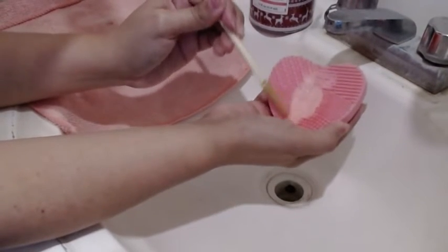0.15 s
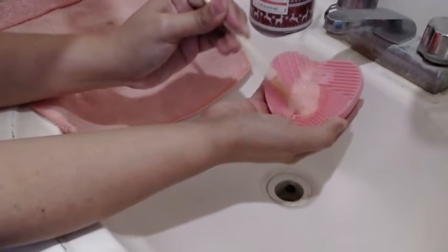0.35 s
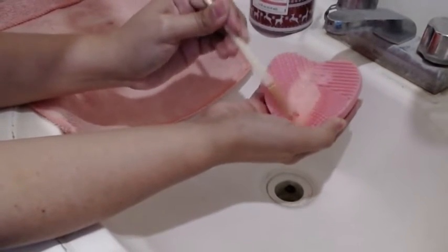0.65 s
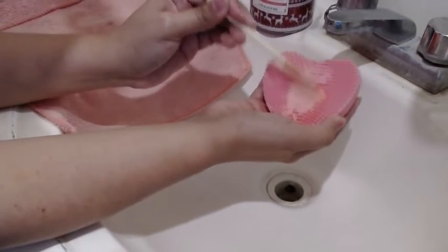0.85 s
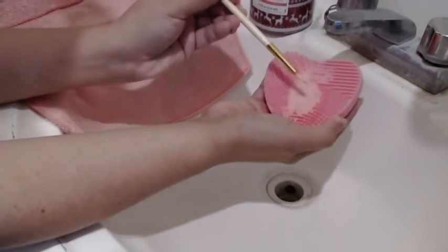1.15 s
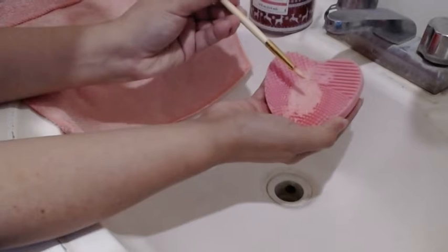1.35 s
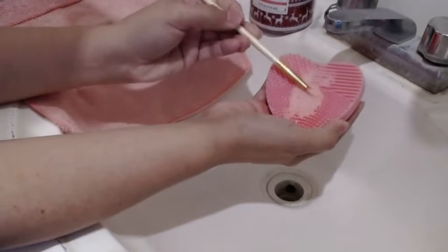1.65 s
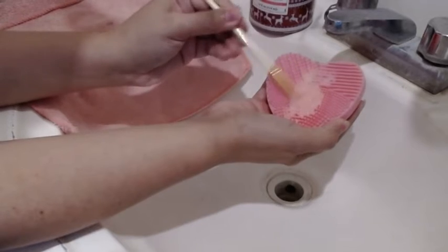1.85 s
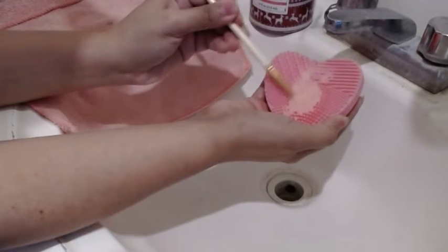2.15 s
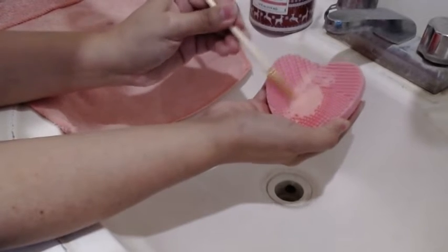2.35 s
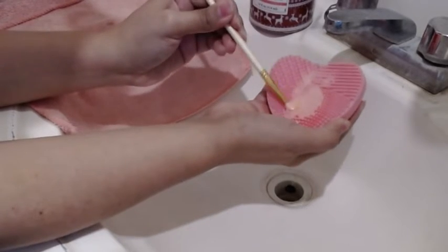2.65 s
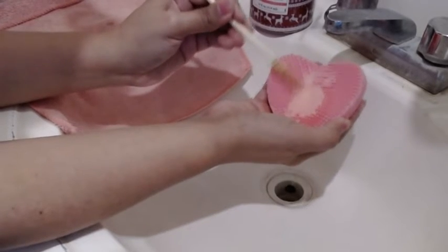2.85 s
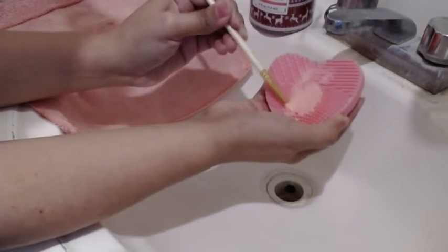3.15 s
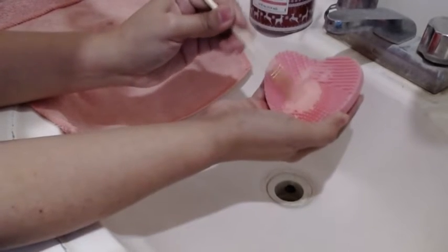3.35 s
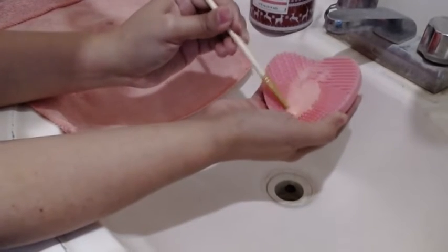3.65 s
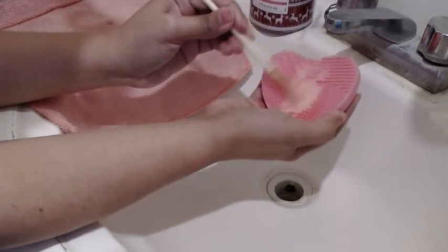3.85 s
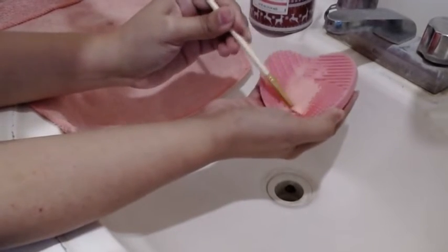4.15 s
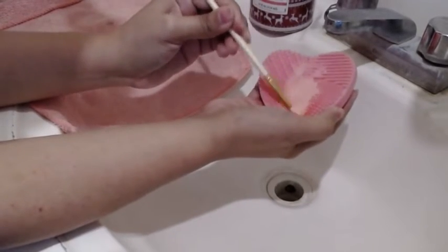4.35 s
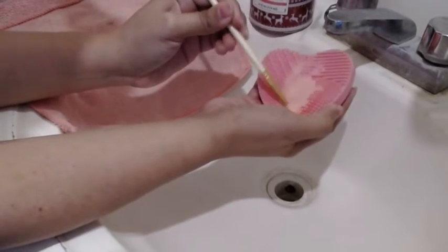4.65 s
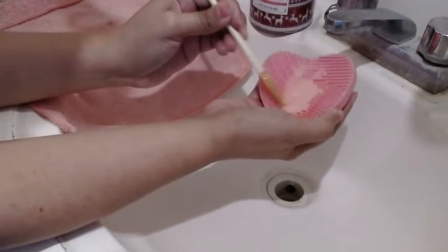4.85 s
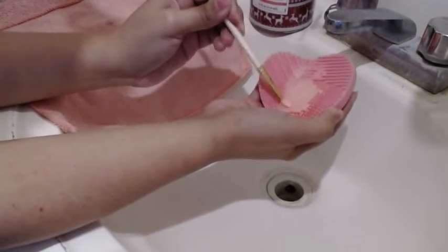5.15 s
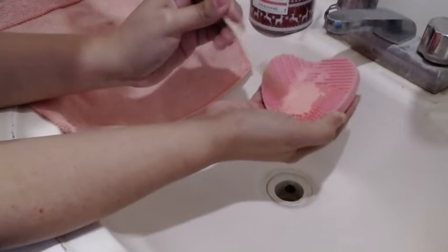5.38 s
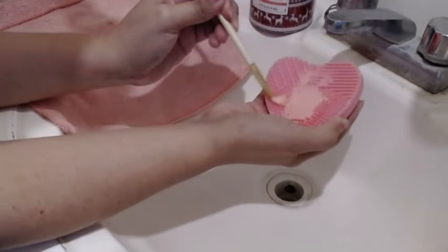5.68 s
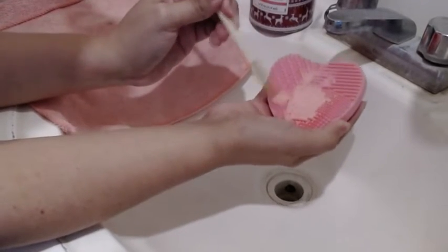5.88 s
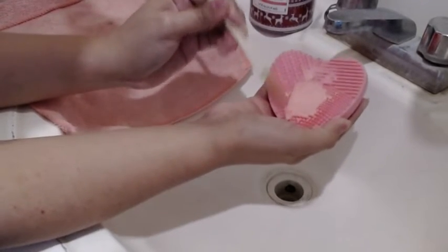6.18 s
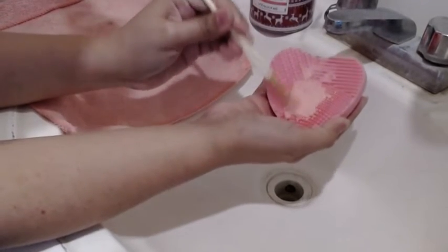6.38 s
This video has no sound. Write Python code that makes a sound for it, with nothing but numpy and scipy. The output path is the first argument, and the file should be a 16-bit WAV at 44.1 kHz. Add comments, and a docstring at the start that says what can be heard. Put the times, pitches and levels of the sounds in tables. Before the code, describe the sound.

Close to the microphone, bristles rub rapidly to and fro over a ribbed silicone pad above a washbasin, making a fine, slightly hollow hiss with faint soapy crackle. The scrubbing stops for a moment early on, then carries on more firmly, the brush now and then knocking the pad. Behind it, the tiled room holds a low hum and a softly swelling boom, with a few soft counter bumps late on.

```python
"""A small brush scrubs to and fro, eight strokes a second, on a ridged silicone pad above a washbasin.
Close to the one microphone, bristles flick off the ridges and hiss, soap film ticks, the hollow pad
resounds and the ferrule now and then knocks it. Behind, in the tiled room: a steady low hum, a swelling
boom, a faint drone and whir, a few dull thuds on the counter, building rumble and faint air noise."""
import sys
import numpy as np
from scipy import signal
from scipy.fft import rfft, irfft, next_fast_len
from scipy.io import wavfile
from scipy.ndimage import uniform_filter1d, map_coordinates

SR = 44100
rng = np.random.default_rng(int(sys.argv[2]) if len(sys.argv) > 2 else 0)


def digitize_waveform(pressure):
    """Quantize a signal to 16-bit integers and store it at the path in sys.argv[1].

    Rows of a 2-D input are taken as channels; values are limited to [-1, 1].
    """
    field = np.atleast_2d(pressure).T
    bounded = np.clip(field, -1, 1)
    quanta = np.round(bounded * 32767).astype(np.int16)
    wavfile.write(sys.argv[1], SR, quanta)


N = 287532
T = np.arange(N) / SR

# Spectra of the bristles' hiss and of their sharper tips: frequency_hz, level_db
HISS_SPECTRUM = [(1500, -23.5), (3000, -4.5), (4300, -2.5), (5600, -1.5), (6800, 1.5), (8200, -1.5),
                 (9500, -6.5), (12000, -18), (16000, -40)]
TIP_SPECTRUM = [(5000, -47), (8500, -3), (10000, -6), (12500, -3), (15000, -7), (17000, -1)]
# Upper resonances of the pad: pitch_hz, width_hz, level_db
PAD_OVERTONES = [(1547, 190, -1.5), (1998, 92, 0.5), (2280, 79, 2), (2480, 106, -1), (2743, 212, 0),
                 (3670, 95, -9.5)]
# Changing colour of the scrubbing: time_s, tips_db, overtones_db, lower_hiss_db
SCRUB_COLOUR = [(0, -10.5, -2.5, 0.5), (.45, -3.5, -2.5, -3), (.9, -4, -6, -1), (1.9, -11, -7, -0.5),
                (2.3, -5.5, -6.5, 5.5), (2.9, -9, -6.5, 1.5), (3.5, -5, -3, 4.5), (4, -1, -5.5, -2),
                (4.7, -1, -2, 0), (5.2, -7.5, -2.5, 4.5), (5.75, -5, -13.5, -7.5), (6.1, -1.5, -10.5, -2),
                (6.3, -14, -2.5, 1), (6.52, -2, -2, 5)]
# Bumps on the counter: start_s, level_db, hardness_db
BUMPS = [(4.694, -39, -22), (5.059, -49.5, 6), (5.383, -39.5, -18), (6.326, -34, -7.5)]


def amp(db):
    return 10 ** (np.asarray(db) / 20)


def unit(x):
    return x / np.sqrt(np.mean(x ** 2) + 1e-20)


def along(points, hz):
    """Interpolate (frequency, value) points on a log axis."""
    f, v = np.transpose(points)
    return np.interp(np.log(hz + 1), np.log(f + 1), v)


def curves(rows):
    """One value per sample for each column after the time."""
    s, *cols = np.transpose(rows)
    return [np.interp(T, s, c) for c in cols]


def wobble(rate):
    """A smooth random curve, rate knots a second."""
    return map_coordinates(rng.standard_normal(int(N * rate / SR) + 4), [T * rate])


def filtered(x, response):
    m = next_fast_len(N + SR // 2)
    return irfft(rfft(x, m) * response(np.fft.rfftfreq(m, 1 / SR)), m)[..., :N]


def coloured(x, spectrum):
    return unit(filtered(x, lambda hz: amp(along(spectrum, hz))))


def resounding(x, modes):
    """x through causal resonances of alternating sign."""
    return filtered(x, lambda f: sum(
        (-1) ** k * amp(db) * 1j * f * width / (hz * hz - f * f + 1j * f * width)
        for k, (hz, width, db) in enumerate(modes)))


def patchy(x, depth_db, window=512, bins=2, frames=12):
    """Raise and lower x in random patches of frequency and time."""
    z = signal.stft(x, nperseg=window)[2]
    field = uniform_filter1d(rng.standard_normal(z.shape), bins, axis=0)
    field = uniform_filter1d(field, frames, axis=1)
    return signal.istft(z * amp(depth_db * unit(field)), nperseg=window)[1][:N]


def swells(peak_s, rise_ms, fall_ms, db, bends):
    """Envelope of swells, about 8 dB down at rise_ms before and fall_ms after each peak."""
    power = np.zeros(N)
    for at, rise, fall, level in np.broadcast(peak_s, rise_ms / 1000, fall_ms / 1000, db):
        gap = np.abs(T - at)
        away = np.where(T < at, (gap / rise) ** bends[0], (gap / fall) ** bends[1])
        power += amp(level - 8.47 * np.minimum(away, 12)) ** 2
    return np.sqrt(power)


def tone(hz, rms):
    return np.sqrt(2) * rms * np.sin(2 * np.pi * np.cumsum(hz) / SR)


def bristle_coloured(x, tips_db):
    return filtered(x, lambda f: amp(np.maximum(along(HISS_SPECTRUM, f), along(TIP_SPECTRUM, f) + tips_db)))


def room_tone():
    """Building rumble and the faint air noise of the room."""
    # Spectra of the two: frequency_hz, level_db
    rumble_spectrum = [(12, -25), (24, 2.5), (38, -8), (50, -32), (63, -10.5), (76, -4), (100, -13),
                       (150, -19.5), (175, -18.5), (185, -22.5), (200, -28), (226, -17.5), (245, -31),
                       (275, -25.5), (300, -32), (420, -42), (700, -86)]
    air_spectrum = [(240, -19), (400, -3), (474, -12.5), (504, -11.5), (708, -13.5), (906, -3),
                    (1350, -13.5), (1680, -4), (2250, -19.5), (3160, -17.5), (3420, -20), (8240, -22.5),
                    (16000, -25)]
    noise = rng.standard_normal((2, N))
    rumble = amp(-49 + 1.24 * wobble(3.046)) * coloured(noise[0], rumble_spectrum)
    return rumble + amp(-62.5 + 1.6 * wobble(5.42)) * coloured(noise[1], air_spectrum)


def hum(pitch_hz=90.8, level_db=-38.5):
    """A steady low tone in the room."""
    return tone(pitch_hz + 0.17 * wobble(1.88), amp(level_db + 0.16 * wobble(3.77)))


def boom(pitch_hz=108):
    """A wavering tone that swells just above the hum."""
    # Its underlying level: time_s, level_db
    bed = [(0, -50), (.8, -45.5), (1.3, -59.5), (1.85, -54), (2.7, -47), (3.3, -43.5), (4.3, -45),
           (5.3, -50.5), (6.52, -49.5)]
    # Its loudest swells: peak_s, half_length_ms, level_db
    surges = [(.21, 50, -38), (.69, 34, -33), (1.94, 52, -40.5), (2.14, 42, -34), (2.41, 65, -32.5),
              (3.07, 180, -39), (3.35, 81, -33), (3.82, 57, -29.5), (4.11, 50, -41), (5.16, 43, -43.5),
              (5.41, 28, -40), (5.67, 80, -37), (5.93, 26, -35), (6.45, 33, -31)]
    s, half, db = np.transpose(surges)
    base = amp(curves(bed)[0] + 5 * wobble(12))
    surge = swells(s, half, half, db, (1.6, 1.6)) * amp(0.73 * wobble(13))
    return tone(pitch_hz + 3.59 * wobble(7.4), np.hypot(base, surge))


def whir(start_s=0.97, length_s=0.5, pitch_hz=153, level_db=-54):
    """A faint tone comes and goes once."""
    fade = np.interp(T - start_s, [0, .08, length_s - .08, length_s], [0, 1, 1, 0])
    return tone(pitch_hz + 0.72 * wobble(5), amp(level_db) * fade)


def drone(pitch_hz=137, rise_ms=19, fall_ms=125):
    """A wandering tone that each thud sets swelling."""
    # Its underlying level: time_s, level_db
    bed = [(0, -54), (1.6, -59), (2.05, -49.5), (2.7, -53), (3.8, -45), (4.3, -52), (5.2, -55),
           (6.1, -58.5), (6.52, -43)]
    s, db, _ = np.transpose(BUMPS)
    stirred = swells(s + rise_ms / 1000, rise_ms, fall_ms, db - 5.5, (3.2, 1.5))
    level = np.hypot(amp(curves(bed)[0]), stirred)
    return tone(pitch_hz + 8 * wobble(19), level * amp(2.9 * wobble(14)))


def thuds():
    """Soft bumps on the counter; harder ones ring its higher modes more."""
    # Modes of the counter: pitch_hz, level_db, t60_s
    counter_modes = [(55, -1.5, 0.15), (134.1, -6.5, 1), (155, -1.5, 0.37), (188, -10.5, 0.086),
                     (218, -9.5, 0.058), (254.8, -3.5, 0.216), (394, 2, 0.058), (540, -2, 0.062),
                     (940, 6, 0.033)]
    out, t = np.zeros(N + SR), T[:SR // 2]
    for s, db, hard_db in BUMPS:
        ring = 0.99 * np.sin(2 * np.pi * 170 * t) * amp(-60 * t / 0.038)  # the push itself
        for hz, level, t60 in counter_modes:
            drift = 0.041 * np.cumsum(rng.standard_normal(len(t)))  # wandering phase dulls the pitch
            struck_db = level + hard_db * np.log2(hz / 200).clip(0, 1)
            ring += amp(struck_db - 60 * t / t60) * np.sin(2 * np.pi * hz * t + drift)
        out[round(s * SR):][:len(t)] += amp(db + 5) * ring * (1 - np.exp(-t / 0.0021))
    return out[:N]


def tiles(x):
    """The tiled room answers, its treble dying soonest."""
    # Reverberation: frequency_hz, t60_s
    decay = [(300, 0.91), (1200, 0.46), (5000, 0.31), (14000, 0.17)]
    hz, t, z = signal.stft(rng.standard_normal(SR // 2), SR, nperseg=256)
    tail = signal.istft(z * amp(-60 * t / along(decay, hz)[:, None]), SR, nperseg=256)[1]
    return signal.fftconvolve(np.pad(x, (200, 0)), tail / np.linalg.norm(tail))[:N]


def knocks(hollow_hz=1190, overtones_db=19):
    """The ferrule hits a ridge: the soft hollow rings briefly, the overtones longer."""
    # Ferrule hits: start_s, level_db
    hits = [(1.866, -35), (2.013, -29), (2.328, -31), (2.614, -25), (2.747, -31), (3.077, -28.5),
            (3.803, -25), (4.041, -30), (4.813, -28), (5.348, -26), (5.528, -30), (5.605, -29),
            (5.658, -25), (5.756, -21.5), (5.891, -26), (6.046, -27), (6.365, -34)]
    blows, impulses = np.zeros((2, N + SR))
    t = T[:900]
    push = np.sin(2 * np.pi * hollow_hz * t) * t ** 2 * np.exp(-t / 0.0011)
    for s, db in hits:
        blows[round(s * SR):][:len(t)] += amp(db) * push / np.abs(push).max()
        impulses[round(s * SR)] += amp(db + overtones_db)
    return blows[:N] + resounding(impulses[:N], PAD_OVERTONES)


def snaps(t60_s=0.032):
    """Many bristles let go together in a burst of hiss."""
    # Bristle releases: start_s, level_db
    releases = [(.2037, -37), (0.582, -36), (1.7973, -48), (1.944, -40), (1.9855, -25.5), (2.0795, -30),
                (2.3215, -29.5), (2.4653, -36), (2.591, -32), (2.7257, -35), (2.9492, -41), (3.0639, -38),
                (3.4214, -42), (3.5495, -26), (3.778, -35), (3.9144, -36), (4.5181, -40), (4.6314, -42),
                (4.806, -32), (5.486, -31), (5.6014, -24), (6.257, -29.5)]
    bursts, t = np.zeros(N + SR), T[:900]
    for s, db in releases:
        bursts[round(s * SR):][:len(t)] += amp(db - 60 * t / t60_s) * rng.standard_normal(len(t))
    return bristle_coloured(bursts[:N], tips_db=-5)


def stroking(part, stretch, bends, lag_ms=0):
    """Envelope of "hiss" or "pad" as strokes speed up and slow; stretch and bends are (rise, fall)."""
    # Brush strokes: start_s, nominal_length_ms, hiss_db, pad_db
    strokes = [(-0.039, 69, -44.5, -45), (0.071, 67, -43, -42.5), (0.207, 71, -41.5, -43),
               (0.324, 57, -41.5, -45), (0.445, 106, -46, -45), (0.566, 59.5, -40.5, -42),
               (0.693, 93, -43.5, -42), (0.821, 53, -41, -42), (0.896, 76, -53.5, -59),
               (1.835, 70, -47, -40), (1.971, 50.4, -37, -34), (2.074, 38, -40.5, -38),
               (2.227, 42.6, -40, -33), (2.32, 53, -42, -34), (2.467, 44.4, -40, -34.5),
               (2.585, 43, -39, -32), (2.713, 55.5, -39.5, -35), (2.829, 41, -38, -34.5),
               (2.953, 54, -38, -34), (3.066, 35, -37, -31), (3.194, 55, -41, -36.5),
               (3.298, 41.7, -38.5, -32), (3.429, 59, -40.5, -36), (3.542, 43, -39, -35.5),
               (3.67, 61, -40, -35.5), (3.789, 27, -31.5, -34), (3.922, 48, -38, -37),
               (4.032, 34.5, -32.5, -37.5), (4.164, 62, -40, -39), (4.273, 46, -37.5, -37),
               (4.4, 63, -40, -40.5), (4.517, 45, -38, -39), (4.651, 69, -40, -38.5),
               (4.798, 36, -38, -38.5), (4.926, 94, -45.5, -42.5), (5.066, 40.5, -43, -39),
               (5.211, 64, -43.5, -39), (5.337, 39, -39, -37), (5.484, 55, -35, -34.5),
               (5.591, 51, -38.5, -33.5), (5.751, 53, -40, -42), (5.862, 43.6, -39, -34.5),
               (6.007, 54, -40, -36), (6.1, 90, -44, -40.5), (6.245, 53, -40.5, -37.5),
               (6.35, 52, -41, -39.5), (6.469, 52, -43, -39.5)]
    start, length, hiss_db, pad_db = np.transpose(strokes)
    rise, fall = 0.37 * length, 0.63 * length
    db = {"hiss": hiss_db, "pad": pad_db}[part]
    return swells(start + (rise + lag_ms) / 1000, stretch[0] * rise, stretch[1] * fall, db, bends)


def dab():
    """Envelope of a light touch while the brush rests."""
    return swells(peak_s=1.63, rise_ms=170, fall_ms=170, db=-75, bends=(4.5, 4.3))


def flicks(per_s, spread_db, smooth, patchy_db):
    """Bristles slip off ridges: uneven impulses over smooth rubbing noise."""
    chance, size, noise = rng.random(N), rng.exponential(size=N), rng.standard_normal((2, N))
    slips = unit((chance < per_s / SR) * amp(spread_db * np.minimum(size, 2.5)) * noise[0])
    rub = np.sqrt(smooth) * noise[1] + np.sqrt(1 - smooth) * slips
    return patchy(rub, patchy_db, window=128, bins=3, frames=6)


def soap(per_s=45, t60_s=0.0059):
    """Sparse sharp ticks of bursting soap film, stronger while the brush moves."""
    ticks = (rng.random(N) < per_s / SR) * amp(7.5 * np.minimum(rng.exponential(size=N), 3))
    bursts = np.abs(signal.fftconvolve(ticks, amp(-60 * T[:300] / t60_s))[:N])
    crackle = bristle_coloured(bursts * rng.standard_normal(N), tips_db=-3)
    return amp(-6) * crackle * stroking("hiss", (1.3, 1.4), (1.5, 1.3))


def pad_hollow(ridges):
    """The hollow of pad and palm answers most just after the fastest rub, as the brush presses hardest."""
    # Resonances of the hollow, and of hand and pad as a whole: pitch_hz, width_hz, level_db
    hollow_modes = [(704, 88, -8), (908, 74, -2), (966, 51, -0.5), (1171.5, 80, 6.5), (1262.4, 113, 1.5),
                    (1416, 91, -4.5)]
    body_modes = [(229, 17, -1), (267.7, 28.6, -2.5), (371.5, 29, -4), (508.5, 37, -0.5)]
    press = stroking("pad", (1.43, 1.09), (1.43, 1.5), lag_ms=11.8) + 1.2 * dab()
    press *= amp(-2.5 + 1.76 * ridges + 0.67 * wobble(45))
    ring = resounding(flicks(350, 2.8, 0.66, 1.9), hollow_modes)
    hollow = unit(patchy(ring, depth_db=3.5))  # the hollow changes shape under the fingers
    body = unit(resounding(rng.standard_normal(N), body_modes))
    return (hollow + amp(-21) * body) * press


def pad_overtones(ridges):
    """Flicking bristles ring the pad's upper resonances."""
    _, overtones_db, _ = curves(SCRUB_COLOUR)
    press = stroking("pad", (1.43, 0.95), (1.87, 1.4), lag_ms=10.97) + 2 * dab()
    ring = resounding(flicks(1500, 2.6, 0.5, 2.9), PAD_OVERTONES)
    return unit(patchy(ring, depth_db=1.8)) * press * amp(overtones_db - 3 + 0.63 * ridges)


def bristles(ridges):
    """Bristles hiss and their tips add a sharper edge, both uneven as ridges pass."""
    tips_db, _, lower_db = curves(SCRUB_COLOUR)
    hiss = coloured(flicks(5000, 5.9, 0.38, 1.9), HISS_SPECTRUM)
    hiss += (amp(lower_db) - 1) * filtered(hiss, lambda hz: 1 / (1 + (hz / 5500) ** 8))
    hiss *= stroking("hiss", (1.084, 1.084), (1.6, 2.0)) + dab()
    tips = coloured(flicks(5000, 2.7, 0.36, 1.8), TIP_SPECTRUM)
    tips *= stroking("hiss", (1.2, 1.16), (1.45, 1.28)) + 0.4 * dab()
    return hiss * amp(-3 + 2 * ridges) + tips * amp(tips_db + 3.4 * ridges)


def scene():
    """The brush close up, the room behind; one microphone feeds both channels."""
    ridges = wobble(70)
    near = bristles(ridges) + pad_hollow(ridges) + soap() + pad_overtones(ridges) + knocks() + snaps()
    sound = near + amp(-9) * tiles(near) + thuds() + hum() + boom() + whir() + drone() + room_tone()
    return np.array([sound, sound])


def record(dry):
    """The recorder keeps nothing above its band limit."""
    top_hz = 15830
    return filtered(dry, lambda hz: hz < top_hz)


dry = scene()
out = record(dry)
digitize_waveform(out)
```